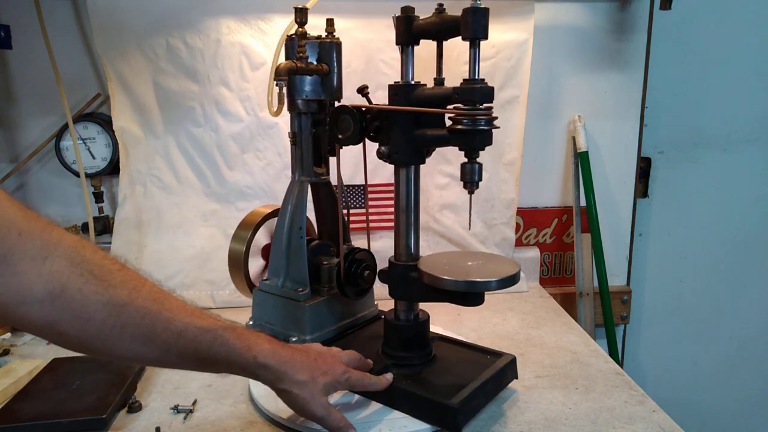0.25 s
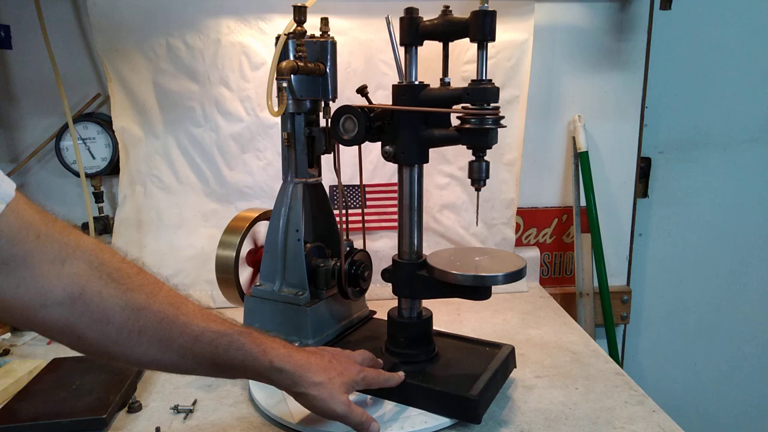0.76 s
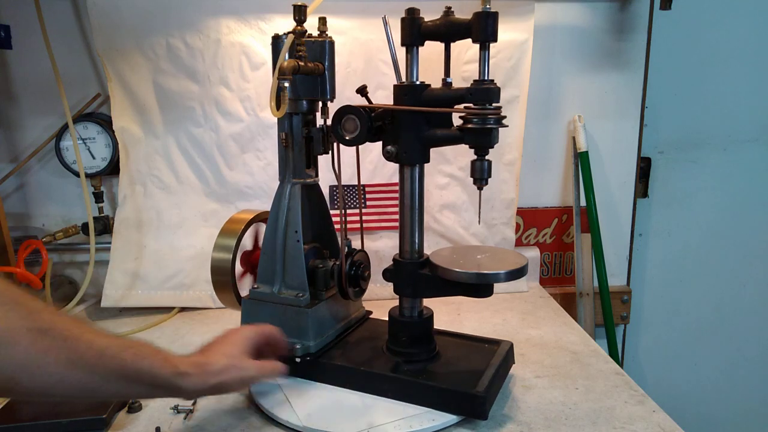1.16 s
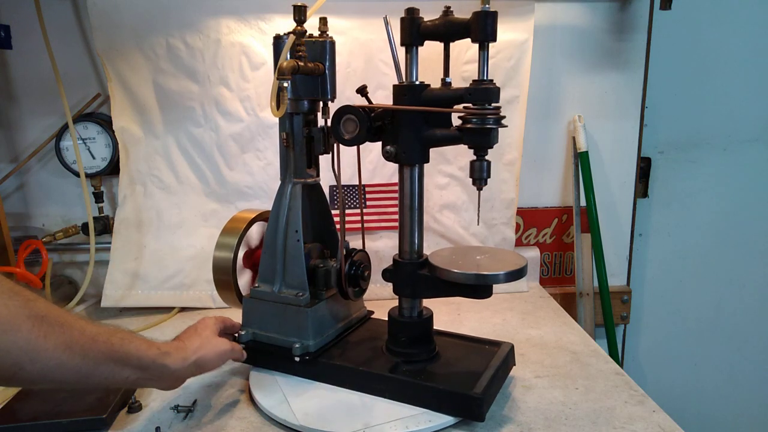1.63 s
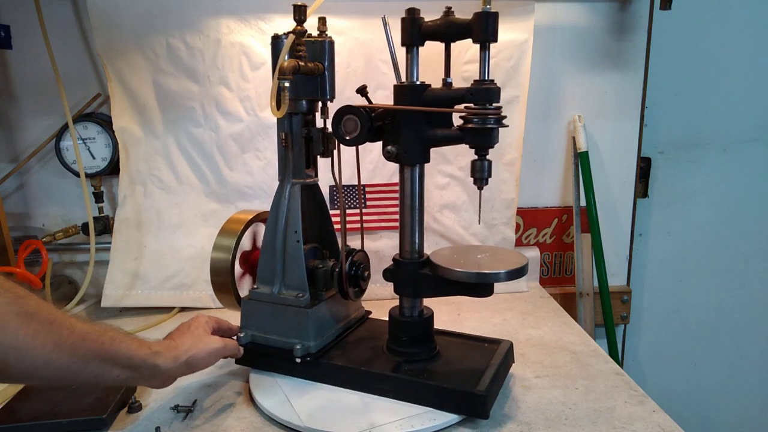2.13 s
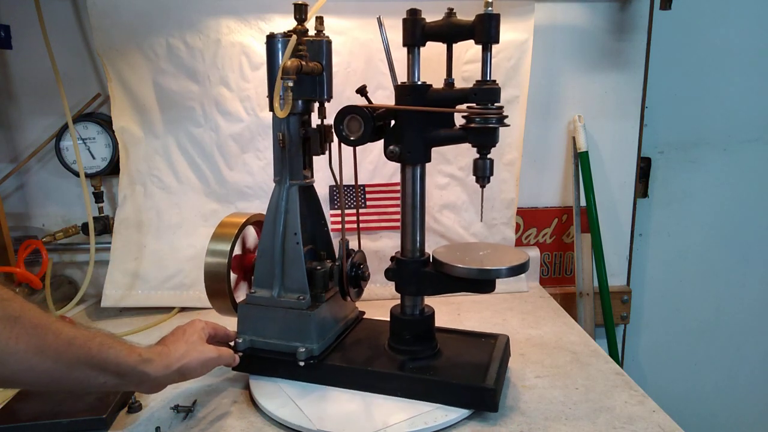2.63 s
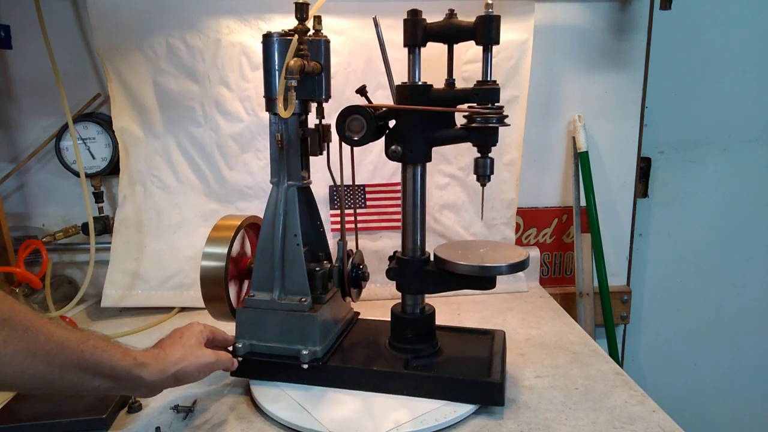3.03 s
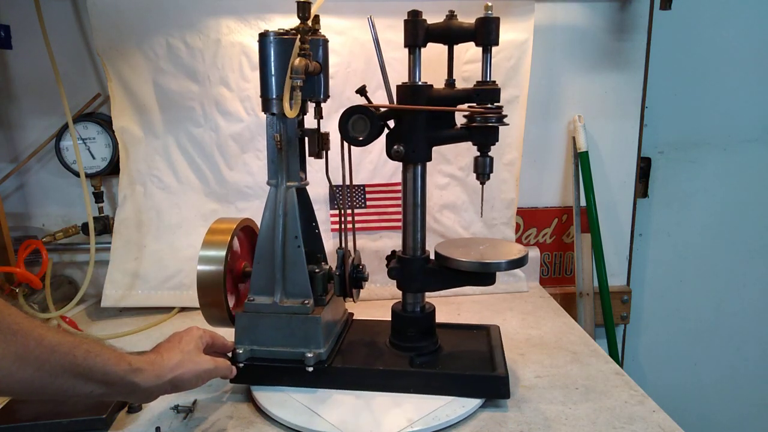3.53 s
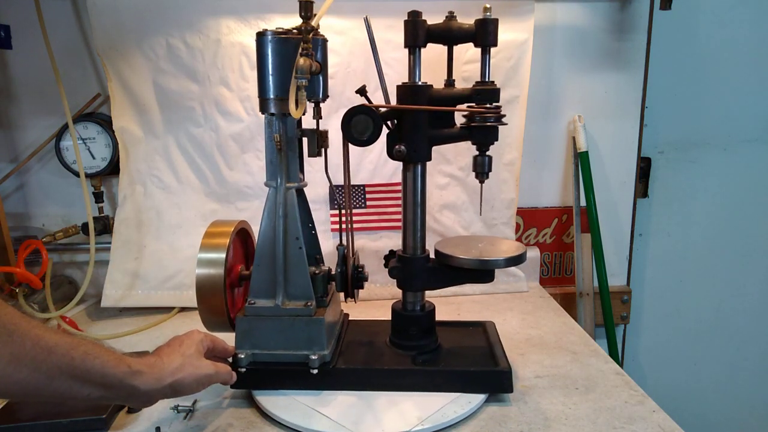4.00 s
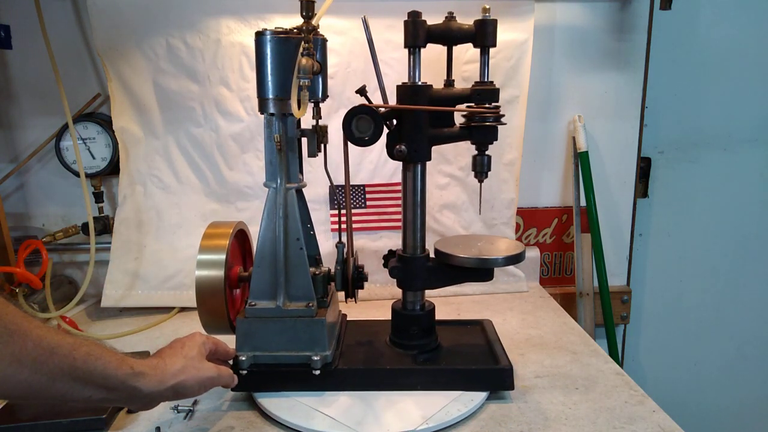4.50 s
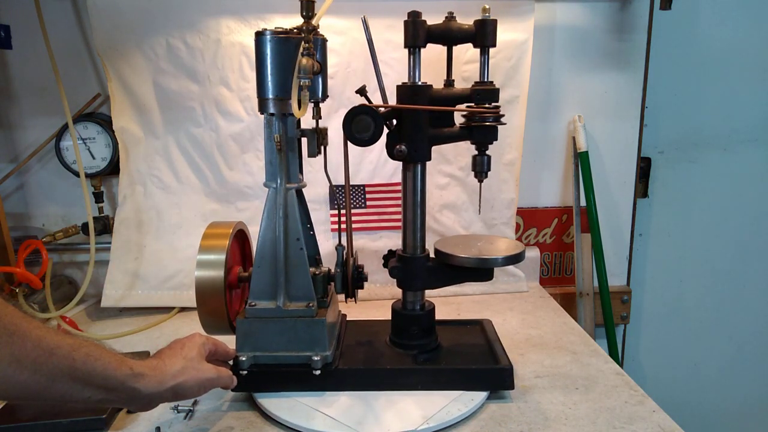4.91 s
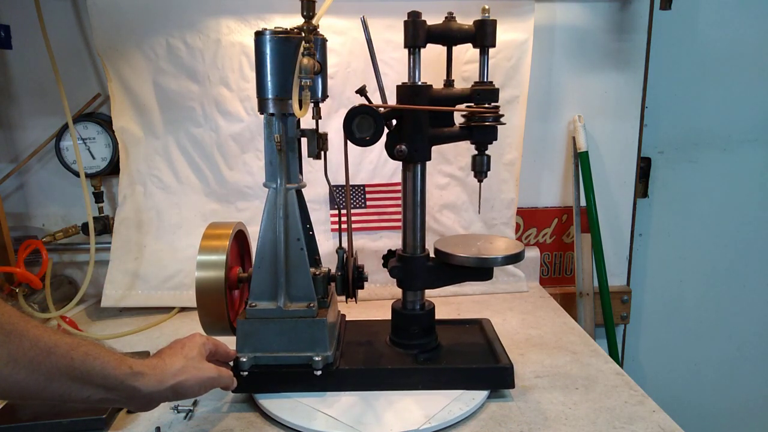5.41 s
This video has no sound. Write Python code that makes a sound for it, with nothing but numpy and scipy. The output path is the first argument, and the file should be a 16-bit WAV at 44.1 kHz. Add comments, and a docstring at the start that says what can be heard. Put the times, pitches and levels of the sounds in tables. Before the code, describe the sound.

A small model steam engine runs on a workbench for the whole five and a half seconds, heard from nearby in a small workshop with a short echo. From the start there is a soft, steady whirr of bearings and the belt that drives a small drill press. From about 0.1 seconds the exhaust chuffs quickly and evenly, a little over five times a second, alternating strong and weak. Each chuff is a short hiss with a very high, shrill whistling edge, slightly to the right, plus a faint toot and a hollow puff. Every stroke gives the bench a soft low thud, and the linkage lightly knocks and ticks between beats. The toot is a little clearer near 2.3, 3.7 and 4.1 seconds. Around 3 seconds, as the engine is turned, the puffs drop slightly in pitch and the room tone shifts. The beat holds to the end.

```python
"""A model steam engine on a workbench turntable drives a small drill press by belt, at about 2.7 turns/s.
Belt and bearings whirr from the start. From 0.08 s the double-acting cylinder exhausts twice a turn,
strong then weak: each chuff is a hiss, a shrill whistle and a brief toot, then a hollow puff.
Each stroke shakes the bench; four times a turn the linkage softly knocks and ticks. The engine is
slowly swung round, fastest near 3 s: the puff drops in pitch and the small workshop's answer shifts."""
import sys
import numpy as np
from scipy import signal
from scipy.fft import rfft, irfft, next_fast_len
from scipy.io import wavfile
from scipy.ndimage import uniform_filter1d

SR = 44100
rng = np.random.default_rng(int(sys.argv[2]) if len(sys.argv) > 2 else 0)


def pcm_store(signal):
    """Save signal as 16-bit PCM."""
    levels = np.round(np.clip(np.atleast_2d(signal), -1, 1) * 32767)
    wavfile.write(sys.argv[1], SR, levels.astype(np.int16).T)


N = 249385

# Belt and bearing spectrum. Each row: frequency in Hz, relative density in dB.
WHIRR_SPECTRUM = [(20, -32), (45, -3.5), (110, -9), (220, -25), (450, -2), (700, -15), (1600, -10.5),
                  (2500, -14), (4600, -11.5), (6400, -3), (10000, 1), (15500, -11)]
# Plain steam jet. Each row: frequency in Hz, relative density in dB.
JET_SPECTRUM = [(100, -37), (400, -17), (1200, -15), (2000, -31), (2700, -19), (4000, -16.5), (6500, -16),
                (8000, -8.5), (11500, -16.5), (14000, -5.5), (16000, -31)]
# Resonances. Each row: centre in Hz, width in Hz, strong-end level in dB, weak-end level in dB.
PASSAGE_MODES = [(2150, 200, -17, -11), (3200, 280, -12, -14), (3620, 300, -8, -6), (4660, 420, 3, 2),
                 (5620, 420, -6, -4), (7700, 300, 5, -9), (12750, 700, -6, -4), (15450, 700, 0, -3)]
PORT_MODES = [(8880, 250, -0.5, 2), (9254, 710, 0, -28), (9800, 1000, -15, -1), (10140, 590, 0.5, 3.5),
              (10740, 820, -6, -3)]
BENCH_MODES = [(55, 23, -8, 0), (108.7, 15, -12, -0.5), (129.3, 19.6, -0.5, -3.5), (170, 10.6, -4, -2),
               (270.2, 11.2, 0.5, 0.5), (334, 45, 4, 3)]
PIPE_MODES = [(780, 490, -6, -11), (1069, 284, -2.5, 0.5), (1176, 245, -3, -12), (1703, 400, -6.5, -9)]
# Exhaust voices, strong end then weak. Each row: relative level in dB, gain at full swing in dB.
HISS_LEVELS = [(-40, 1.14), (-43, 1.84)]
WHISTLE_LEVELS = [(-24.5, 0.14), (-30, .1)]
TOOT_LEVELS = [(-49, -1.4), (-55, 3.3)]
PUFF_LEVELS = [(-57, 3.2), (-53, 3.55)]
PIPE_AIR_LEVELS = [(-48, 0.33), (-48, 2.8)]
# Turntable position. Each row: time in seconds, share of full swing from 0 to 1.
SWING = [(0, 0), (1.2, 0.11), (2.55, 0.25), (3.3, 0.88), (4.2, 1), (5.6, 0.95)]
# Ring of the passages over the jet. Each row: time in seconds, gain in dB.
PASSAGE_RING = [(0.3, .3), (1.1, -0.5), (1.6, 0.5), (3.6, 0), (4.6, 1.5), (5.5, 0.5)]
# Whistle beam. Each row: time in seconds, gain in dB, left relative to right in dB.
WHISTLE_BEAM = [(0, -1.3, -3.5), (.75, 1.6, -12), (1.25, -0.7, -19), (2.03, -0.5, -20), (2.35, 2.5, -18),
                (3.9, 1.3, -14), (5.6, 1.3, -22)]
# Strong beats at which the pipe speaks in full. Each entry: time in seconds.
FULL_TOOT_TIMES_S = [2.27, 3.73, 4.09]
# Drive on the bench. Each row: time in seconds, level in dB, favoured frequency in Hz.
BENCH_DRIVE = [(0, -55.5, 130), (1.2, -59.5, 120), (2.5, -59.5, 137), (4.2, -59.5, 193), (5.6, -56.5, 168)]
# Echoes off bench and walls. Each row: delay in seconds, linear gain.
ECHOES = [(.014, .3), (.0225, .85), (.048, .2)]
# Linkage play. Each row: delay after the strong beat in seconds, knock in dB, tick in dB.
LINKAGE_PLAY = [(.062, -58.5, -52), (0.115, -60.5, -72), (0.242, -64, -49), (0.277, -65, -52)]
# Workshop decay. Each row: frequency in Hz, T60 in seconds.
ROOM_T60 = [(100, 0.36), (500, 0.4), (1200, 0.28), (3000, 0.26), (5000, 0.33), (10000, 0.32), (15000, 0.23)]

BEAT_S = np.arange(8192) / SR - 1 / 50  # time axis around one beat
FIRST_BEAT_S, TURN_S, TURN_SHORTENING_S = 0.077, 0.367, 0.000384
WEAK_OFFSET_TURNS = 0.4744
SCATTER_DB, WHISTLE_SCATTER_DB, TOOT_SCATTER_DB, MODE_SCATTER_DB = .6, .7, 2, 1.5  # beat to beat
WHISTLE_AIM_HZ, AIM_SCATTER_HZ = (10130, 9910), 170  # strong, weak; tilts the port's modes
TOOT_HZ, FULL_TOOT_GAIN_DB = (1564, 1643), 7  # strong, weak
PUFF_START_HZ, PUFF_SWUNG_HZ = 502.6, 456.8
LOW_CUT_HZ, TOP_HZ = 36, 15850


def amp(db):
    """Decibels to gain."""
    return 10 ** (np.asarray(db) / 20)


def unit(x):
    """Scale to rms 1."""
    return x / np.sqrt(np.mean(x ** 2) + 1e-20)


def along(points, hz):
    """Read (Hz, value) points on a log axis."""
    points_hz, values = np.transpose(points)
    return np.interp(np.log(hz + 1), np.log(points_hz + 1), values)


def filtered(x, response):
    """Apply a frequency response to x."""
    size = next_fast_len(N + SR // 2)
    return irfft(rfft(x, size) * response(np.fft.rfftfreq(size, 1 / SR)), size)[..., :N]


def body(modes, end=0, base=None):
    """Minimum-phase response of unit power: one cylinder end's modes over an optional base spectrum."""
    hz = np.fft.rfftfreq(len(BEAT_S), 1 / SR)
    power = sum(amp(dbs[end]) ** 2 / (1 + (2 * (hz - centre_hz) / width_hz) ** 2) ** 2
                for centre_hz, width_hz, *dbs in modes)
    if base is not None:
        power = power + amp(along(base, hz)) ** 2
    cepstrum = irfft(np.log(power / power.mean() + 1e-12) / 2)
    cepstrum[1:len(hz) - 1] *= 2
    cepstrum[len(hz):] = 0
    return np.exp(rfft(cepstrum))


def surge(at_s, rise_s, fall_s):
    """Envelope of height 1: exponential rise and fall, crossing at at_s."""
    rising = np.exp(np.minimum((at_s - BEAT_S) / rise_s, 20))
    falling = np.exp(np.minimum((BEAT_S - at_s) / fall_s, 20))
    shape = 1 / (rising + falling)
    return shape / shape.max()


def burst(envelope, response):
    """Enveloped noise rung through a body."""
    return irfft(rfft(envelope * rng.standard_normal(len(BEAT_S))) * response)


def waver(samples):
    """Smoothed noise of rms 1, one beat long."""
    noise = rng.standard_normal(len(BEAT_S))
    return unit(uniform_filter1d(uniform_filter1d(noise, samples), samples))


def add(track, s, sound):
    """Mix one beat's sound in at time s."""
    start = round((s + BEAT_S[0]) * SR)
    part = track[..., start:start + len(BEAT_S)]
    part += sound[..., :part.shape[-1]]


def beat_times(turns=16):
    """Two beats a turn, strong then weak; the engine gains a little speed."""
    turn = np.add.outer(np.arange(turns), [0, WEAK_OFFSET_TURNS]).ravel()
    times_s = FIRST_BEAT_S + TURN_S * turn - TURN_SHORTENING_S * turn ** 2 / 2
    return times_s[times_s < N / SR]


def swung(s):
    """Share of full turntable swing at time s."""
    return np.interp(s, *np.transpose(SWING))


def beats(levels, scatter_db=SCATTER_DB):
    """Time in seconds, cylinder end (0 strong, 1 weak) and relative dB for each beat of one voice."""
    times_s = beat_times()
    ends = np.arange(len(times_s)) % 2
    level_db, swing_db = np.array(levels)[ends].T
    beat_db = level_db + swing_db * swung(times_s) + scatter_db * rng.standard_normal(len(times_s))
    return zip(times_s, ends, beat_db)


def stereo_noise(samples, alike_hz):
    """Two noise channels: alike in the bass, unrelated in the treble."""
    mid, side = rfft(rng.standard_normal((2, samples)))
    angle = np.pi / 4 * np.tanh(0.48 + np.fft.rfftfreq(samples, 1 / SR) / alike_hz)
    mid, side = np.cos(angle) * mid, np.sin(angle) * side
    return irfft([mid + side, mid - side], samples)


def direct(x, lag_s=.0001):
    """Straight path: arrives on the right first."""
    return filtered(x, lambda hz: np.exp(-2j * np.pi * hz * np.array([[lag_s], [0]])))


def workshop(x):
    """Diffuse room answer: four tails crossfade as the engine is swung round."""
    answer = np.zeros((2, N))
    for place in np.linspace(0, 1, num=4):
        hz, t, spectra = signal.stft(stereo_noise(SR // 2, alike_hz=990), SR, nperseg=256)
        decay = amp(-60 * t / along(ROOM_T60, hz)[:, None])
        tail = signal.istft(spectra * decay, SR, nperseg=256)[1]
        tail *= 1 - np.exp(-np.arange(tail.shape[1]) / SR / 0.00058)
        tail /= np.linalg.norm(tail[0])
        nearness = np.sqrt(np.maximum(1 - 3 * abs(np.arange(N) / N - place), 0))
        answer += signal.fftconvolve(np.atleast_2d(x * nearness), tail, axes=1)[:, :N]
    return answer


def belt_whirr():
    """Belt and bearings whirr steadily."""
    noise = stereo_noise(N, alike_hz=705)
    return amp(-56.5) * unit(filtered(noise, lambda hz: amp(along(WHIRR_SPECTRUM, hz))))


def steam_hiss():
    """Steam blows down through the passages; the piston then pushes out the rest."""
    track = np.zeros(N)
    blowdown = surge(at_s=0, rise_s=0.0027, fall_s=0.0045)
    push = surge(at_s=0.063, rise_s=0.014, fall_s=0.015)
    trickle = body([(2500, 2400, -14.0)], base=JET_SPECTRUM)
    for s, end, db in beats(HISS_LEVELS):
        ring_db = np.interp(s, *np.transpose(PASSAGE_RING))
        modes = [(hz, width_hz, dbs[end] + ring_db + MODE_SCATTER_DB * rng.standard_normal())
                 for hz, width_hz, *dbs in PASSAGE_MODES]
        add(track, s, amp(db + 8) * burst(blowdown, body(modes, base=JET_SPECTRUM)))
        add(track, s, amp(db + (-22, -15)[end]) * burst(push, trickle))
    return (direct(track) + amp(3) * workshop(track)) * amp([[.5], [-.5]])


def port_whistle():
    """At full flow the port's edge shrills in quick flutters, beamed to the right."""
    track, beam = np.zeros(N), np.zeros((2, N))
    envelope = surge(at_s=0.0017, rise_s=0.0026, fall_s=0.0053)
    times_s, beam_db, left_db = np.transpose(WHISTLE_BEAM)
    for s, end, db in beats(WHISTLE_LEVELS, WHISTLE_SCATTER_DB):
        aim_hz = WHISTLE_AIM_HZ[end] + AIM_SCATTER_HZ * rng.standard_normal()
        tilt_db = (aim_hz - 9900) / 9  # per unit of log pitch: a faster jet favours higher modes
        port = body([(hz, width_hz, dbs[end] + tilt_db * np.log(hz / aim_hz))
                     for hz, width_hz, *dbs in PORT_MODES])
        sound = burst(envelope * amp(0.5 * waver(samples=30)), port)
        sound *= np.linalg.norm(envelope) / np.linalg.norm(sound)
        sound *= amp(db + np.interp(s, times_s, beam_db) + 3)
        add(track, s, sound)
        add(beam, s, sound * amp([[np.interp(s, times_s, left_db)], [0]]))
    return direct(beam) + amp([[-9], [-2.5]]) * workshop(track)


def pipe_toot():
    """The pipe toots as the valve cracks open: clear at the strong end, breathy at the weak."""
    track = np.zeros(N)
    envelope = surge(at_s=0.0024, rise_s=0.0028, fall_s=0.0053)
    for s, end, db in beats(TOOT_LEVELS, TOOT_SCATTER_DB):
        jitter_rad = 1.3 if end else .5
        is_full = np.any(abs(s - np.array(FULL_TOOT_TIMES_S)) < TURN_S / 10)
        flutter = amp(2 * waver(samples=100))
        tone = np.sin(2 * np.pi * TOOT_HZ[end] * BEAT_S + jitter_rad * waver(samples=110))
        add(track, s, amp(db + is_full * FULL_TOOT_GAIN_DB + 7) * envelope * flutter * tone)
    return (direct(track) + amp(-4.5) * workshop(track)) * amp([[1.2], [-1.2]])


def bench_shake():
    """Each stroke jolts the bench; the engine's position decides which modes it drives best."""
    track = np.zeros(N)
    jolt = surge(at_s=.01, rise_s=.002, fall_s=.028)
    times_s, drive_db, favoured_hz = np.transpose(BENCH_DRIVE)
    for i, s in enumerate(beat_times()):
        best_hz = np.interp(s, times_s, favoured_hz)
        bench = body([(hz, width_hz, dbs[i % 2] - 9 * abs(np.log2(hz / best_hz)))
                      for hz, width_hz, *dbs in BENCH_MODES])
        add(track, s, amp(np.interp(s, times_s, drive_db)) * burst(jolt, bench))
    return direct(track) + amp(-13) * workshop(track)


def steam_puff():
    """The slug of steam follows the hiss: a hollow pressure pulse, with turbulence in the pipe."""
    pulse, air = np.zeros(N), np.zeros(N)
    pipe = [body(PIPE_MODES, end) for end in range(2)]
    swell = surge(at_s=0.012, rise_s=0.0024, fall_s=0.0026)
    rush = surge(at_s=0.013, rise_s=0.003, fall_s=0.0082)
    # the pulse returns as distinct echoes off bench and walls
    echoes = sum(gain * np.interp(BEAT_S - delay_s, BEAT_S, swell) for delay_s, gain in ECHOES)
    for s, _, db in beats(PUFF_LEVELS):
        hz = PUFF_START_HZ + (PUFF_SWUNG_HZ - PUFF_START_HZ) * swung(s)
        tone = np.sin(2 * np.pi * hz * BEAT_S + .25 * waver(samples=120))
        add(pulse, s, amp(db + 13) * (swell + echoes) * tone)
    for s, end, db in beats(PIPE_AIR_LEVELS):
        add(air, s, amp(db + 4) * burst(rush, pipe[end]))
    return direct(pulse + air) + amp(-9.5) * workshop(pulse) + amp(-4) * workshop(air)


def linkage_clatter():
    """The linkage takes up play four times a turn: soft knocks in the casting, ticks in the steel."""
    track = np.zeros(N)
    casting = body([(463, 260, 4.5), (1420, 1070, -7.0), (2200, 280, -11)])
    steel = body([(13500, 6700, 25), (3020, 1500, -21)])
    for s in beat_times()[::2]:
        for delay_s, knock_db, tick_db in LINKAGE_PLAY:
            jitter_s, scatter_db = rng.standard_normal(2) * [.003, 2.5]
            knock = amp(knock_db) * burst(surge(at_s=0, rise_s=0.013, fall_s=0.013), casting)
            tick = amp(tick_db) * burst(surge(at_s=0, rise_s=0.00036, fall_s=.002), steel)
            add(track, min(s + delay_s + jitter_s, N / SR), amp(scatter_db) * (knock + tick))
    return direct(track) + amp(-10) * workshop(track)


def scene():
    """The running engine in its workshop."""
    return (belt_whirr() + steam_hiss() + port_whistle() + pipe_toot()
            + bench_shake() + steam_puff() + linkage_clatter())


def record(dry):
    """Roll off the deepest bass; cut everything above TOP_HZ."""
    return filtered(dry, lambda hz: (hz < TOP_HZ) * hz ** 4 / (hz ** 4 + LOW_CUT_HZ ** 4))


dry = scene()
out = record(dry)
pcm_store(out)
```